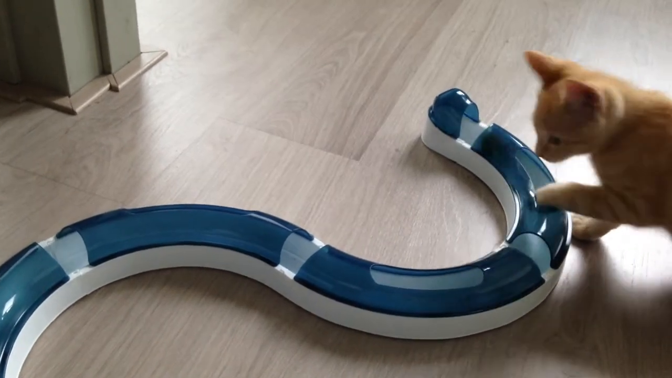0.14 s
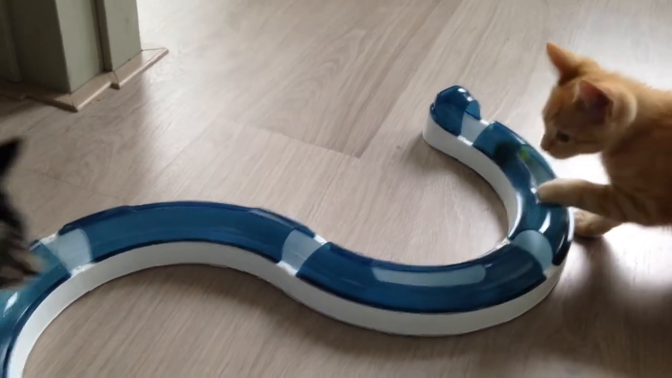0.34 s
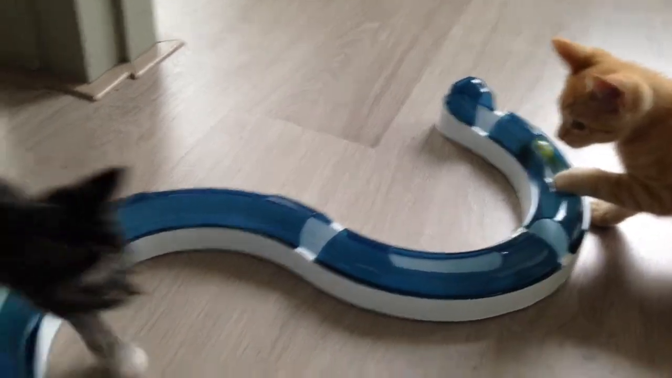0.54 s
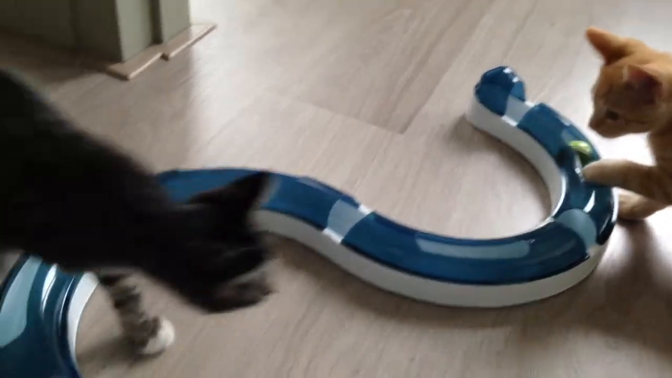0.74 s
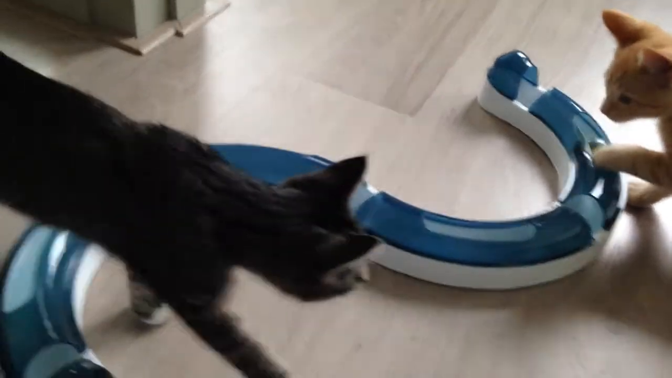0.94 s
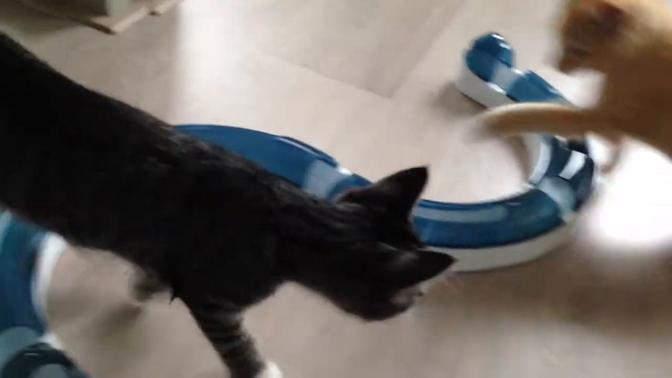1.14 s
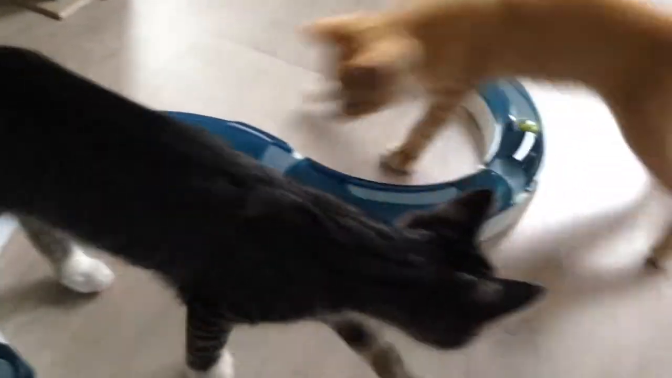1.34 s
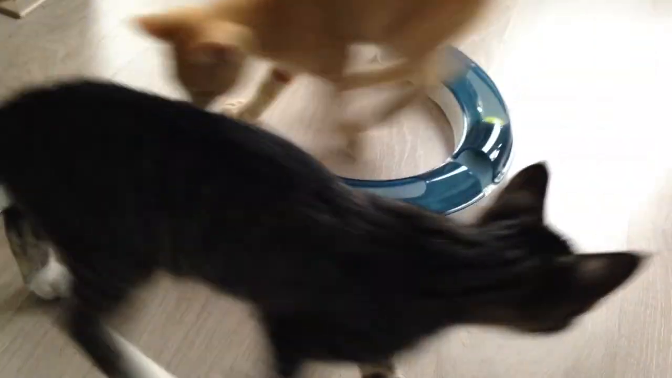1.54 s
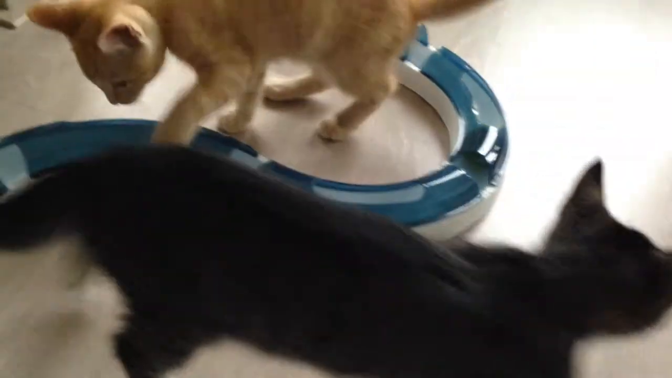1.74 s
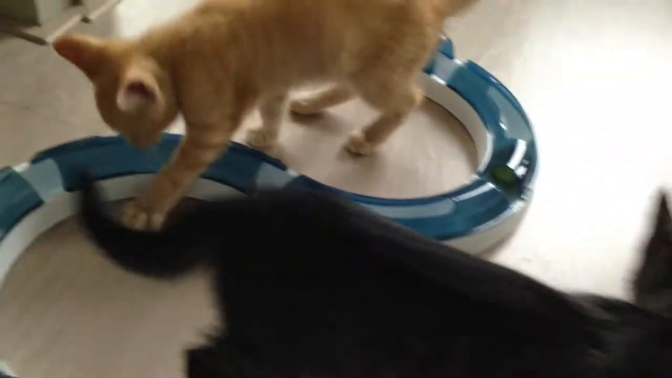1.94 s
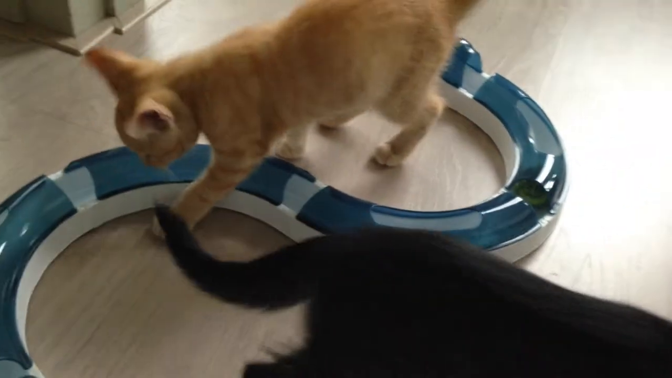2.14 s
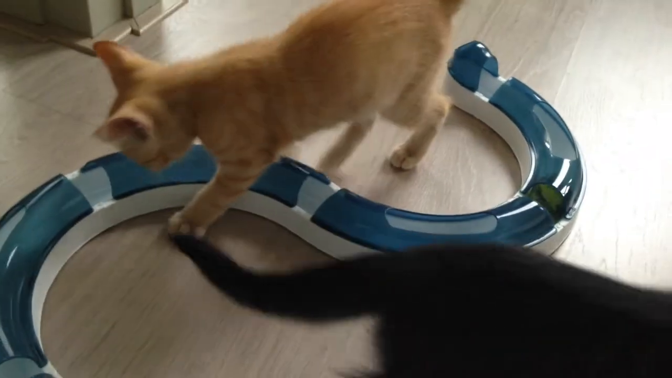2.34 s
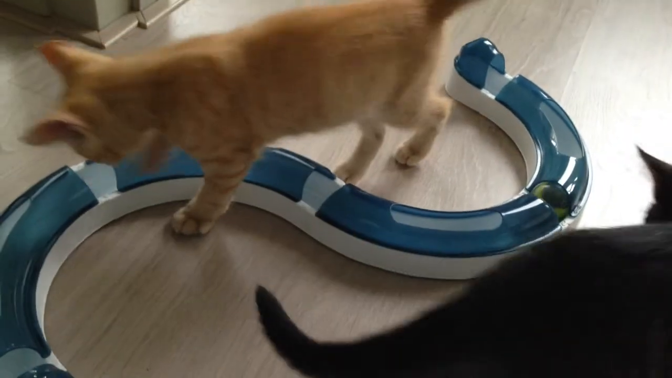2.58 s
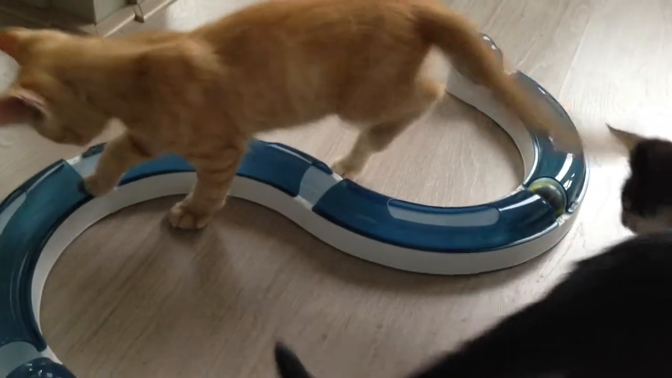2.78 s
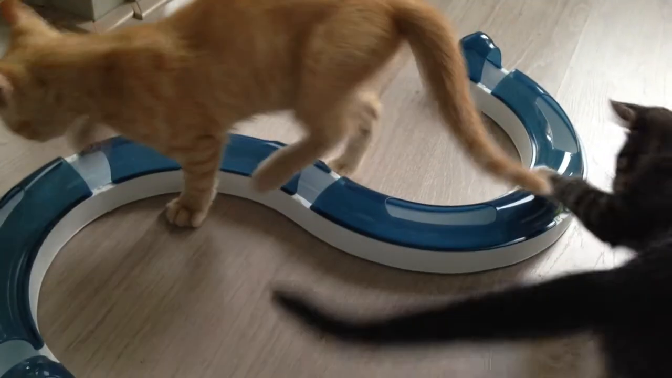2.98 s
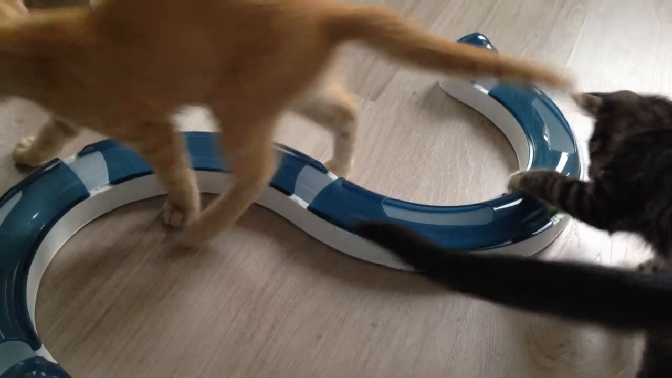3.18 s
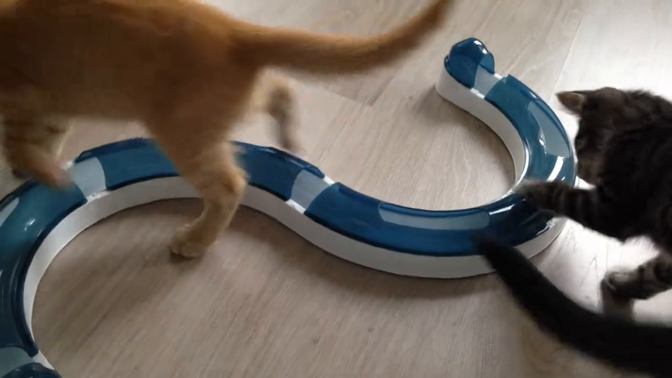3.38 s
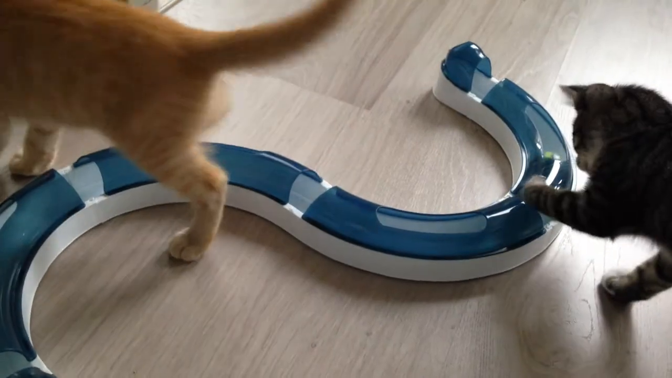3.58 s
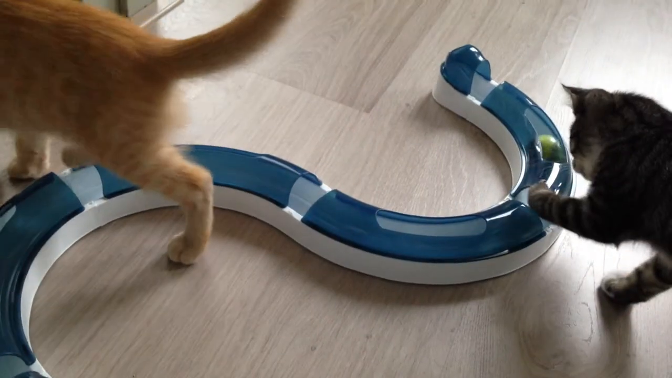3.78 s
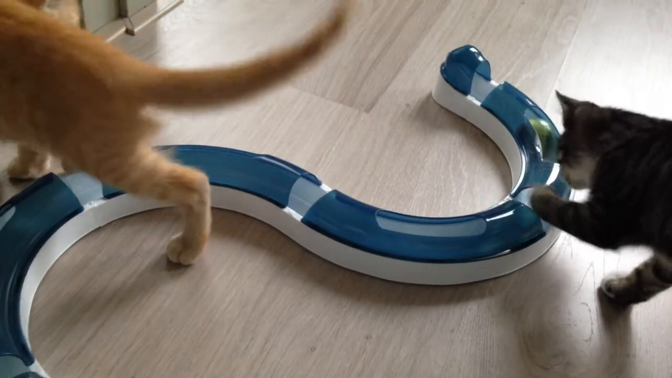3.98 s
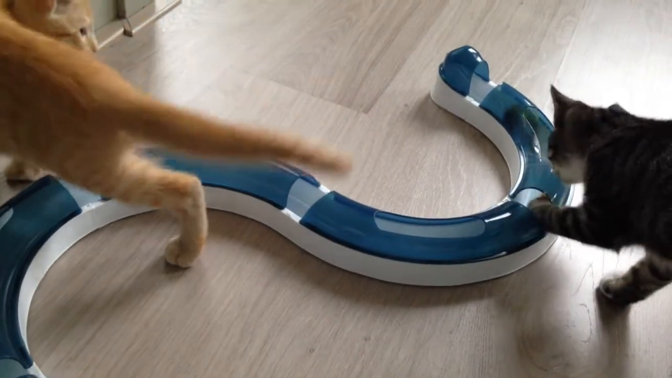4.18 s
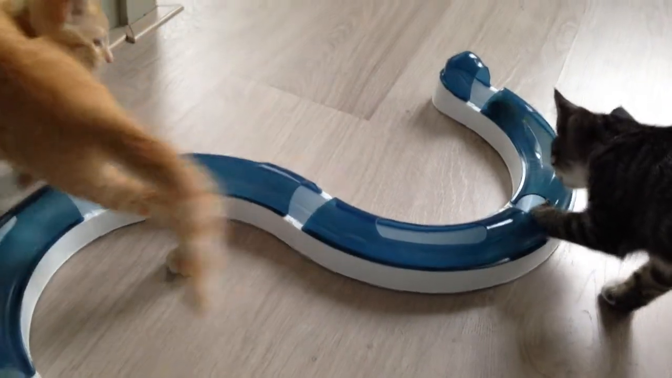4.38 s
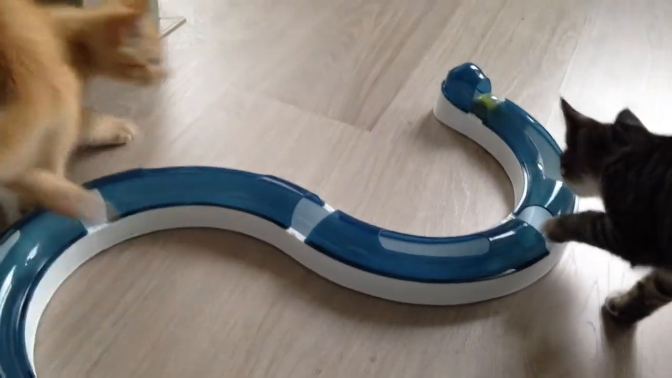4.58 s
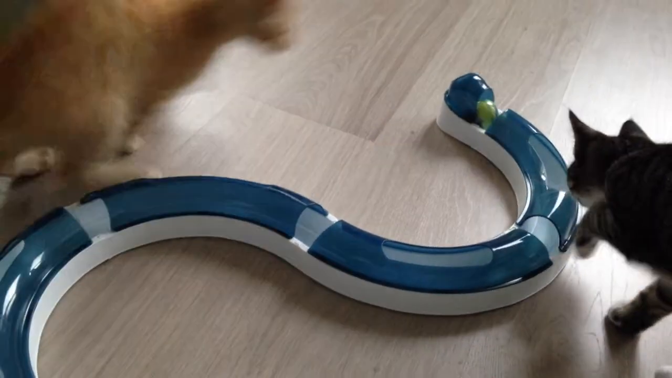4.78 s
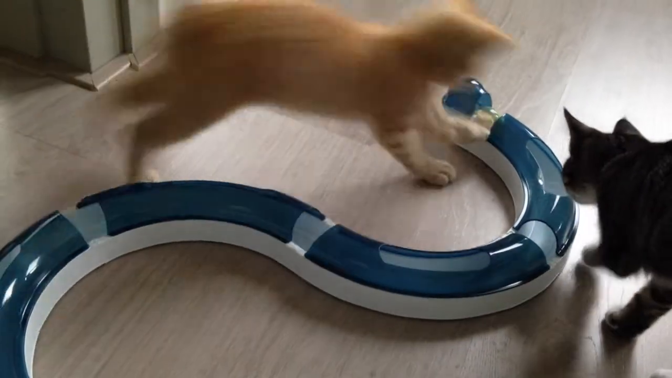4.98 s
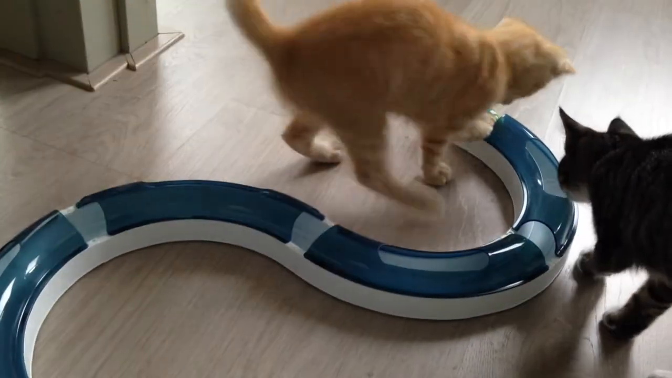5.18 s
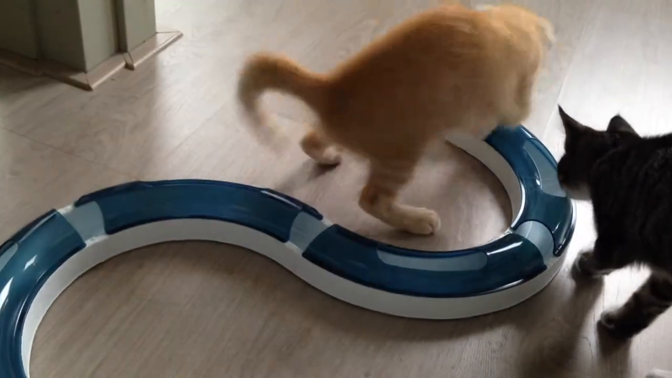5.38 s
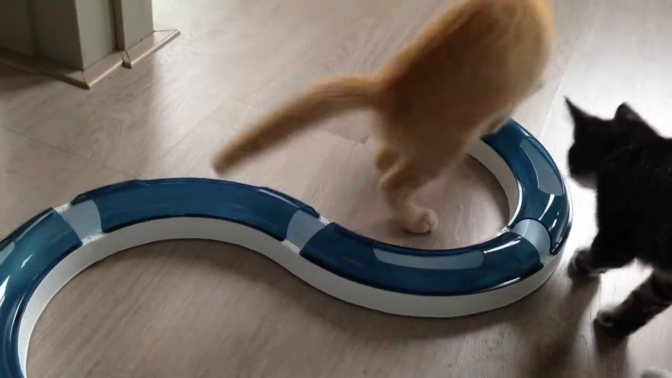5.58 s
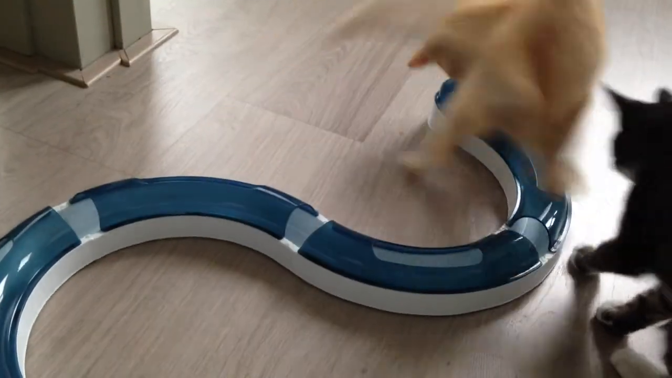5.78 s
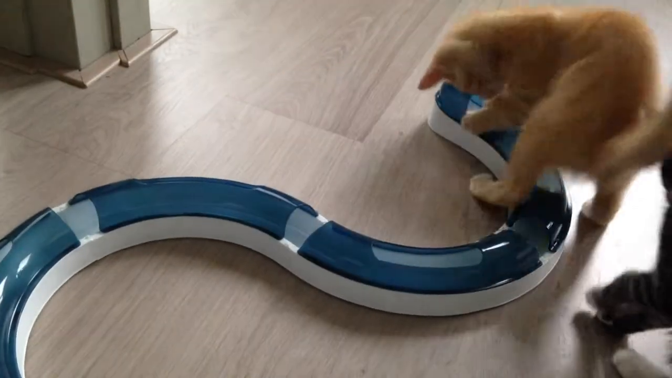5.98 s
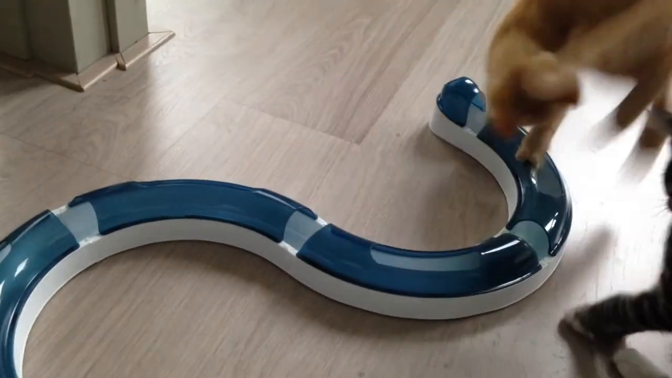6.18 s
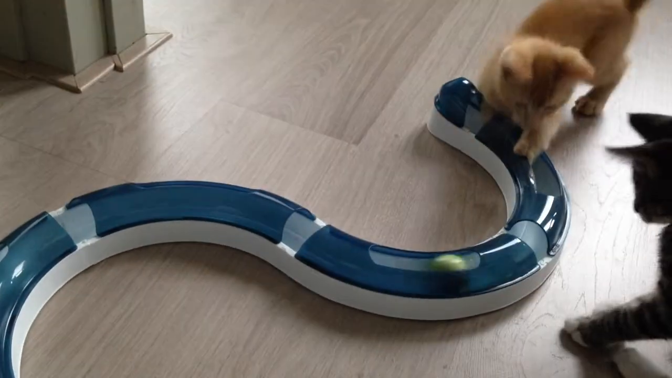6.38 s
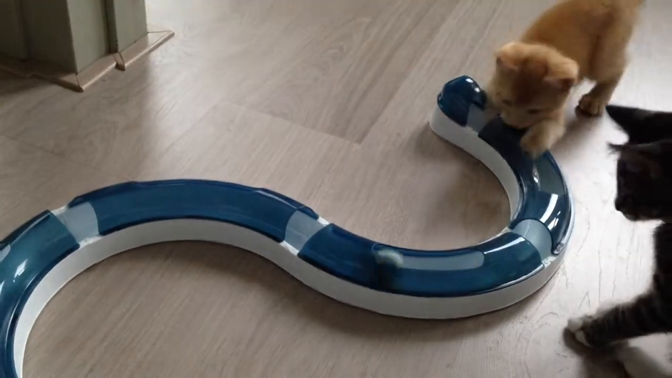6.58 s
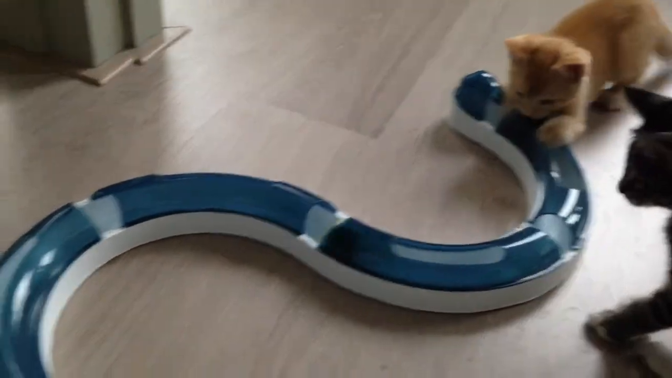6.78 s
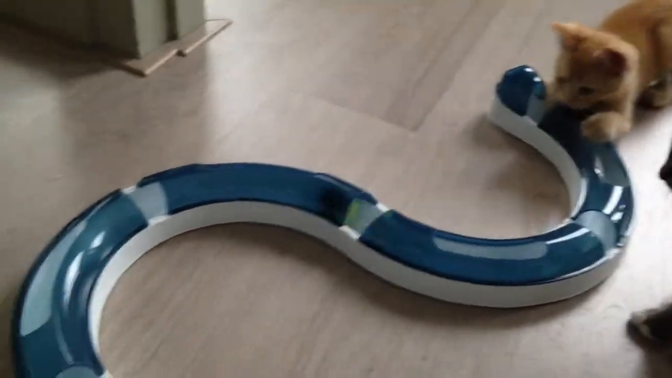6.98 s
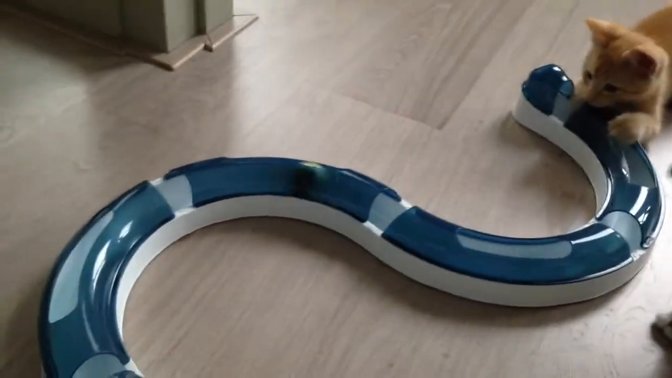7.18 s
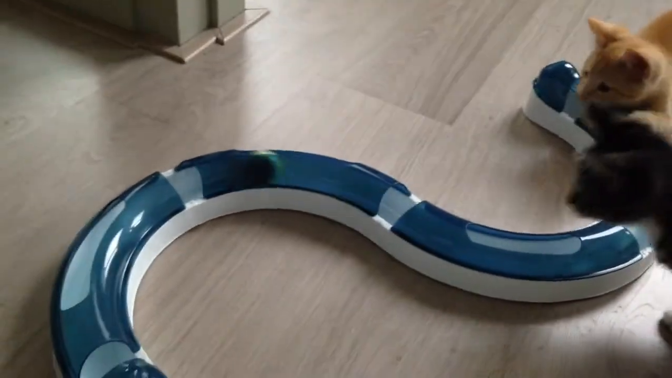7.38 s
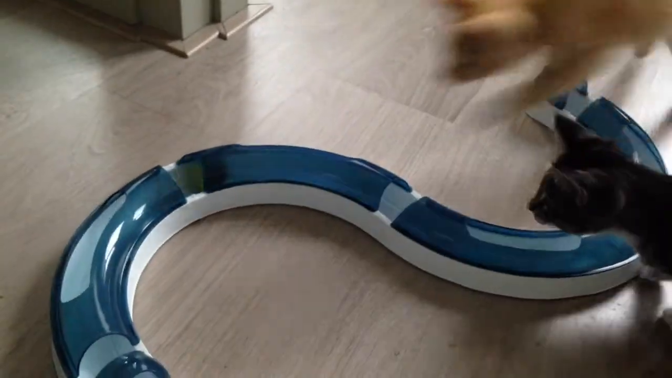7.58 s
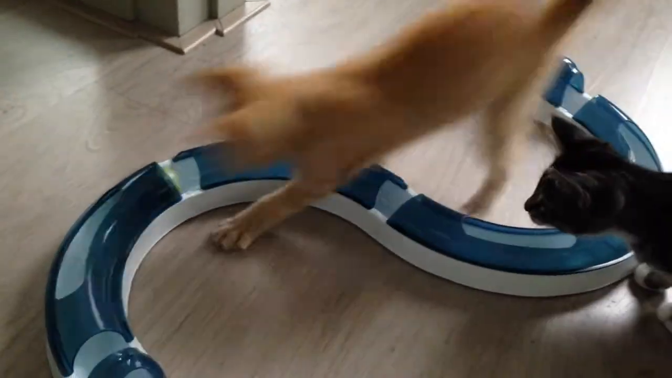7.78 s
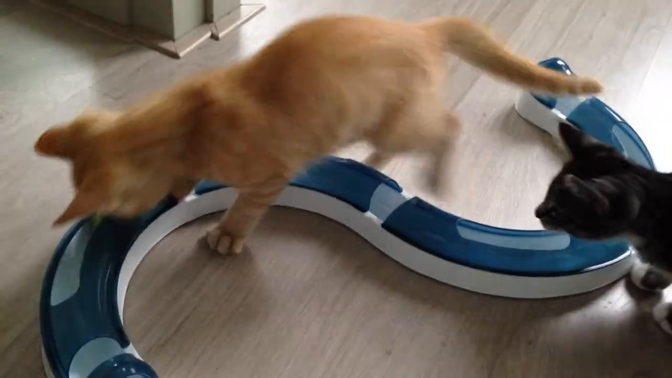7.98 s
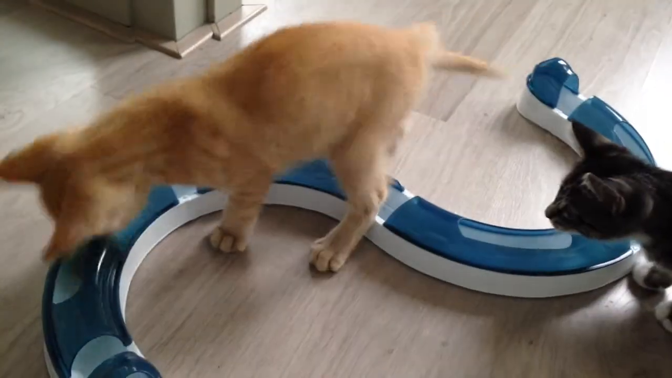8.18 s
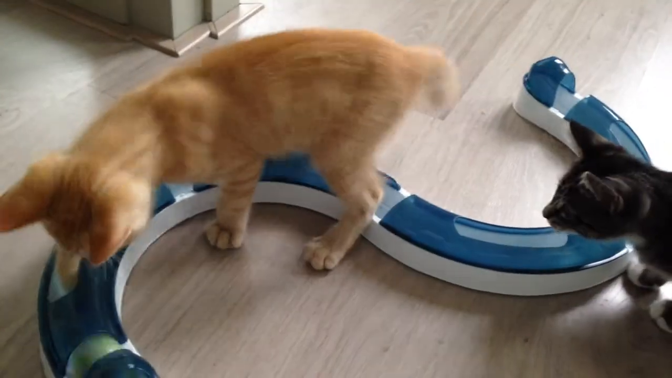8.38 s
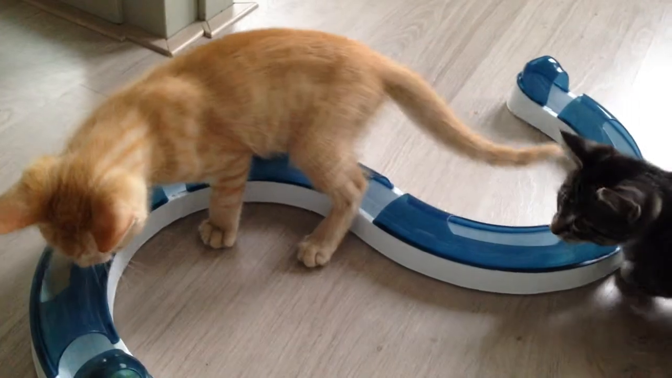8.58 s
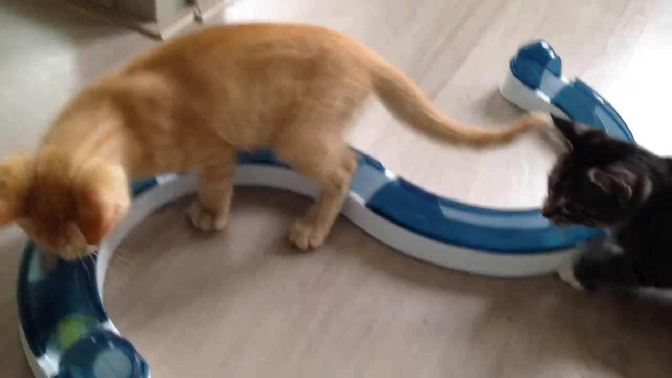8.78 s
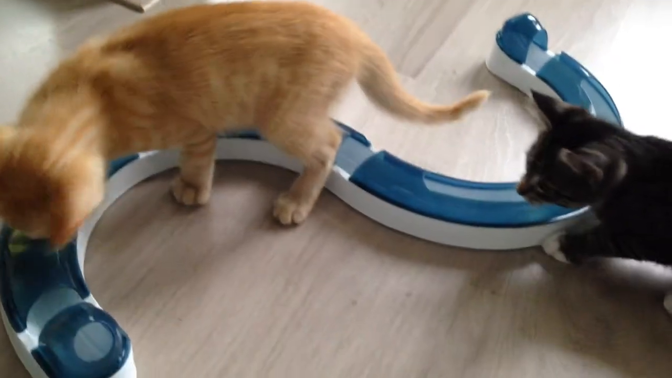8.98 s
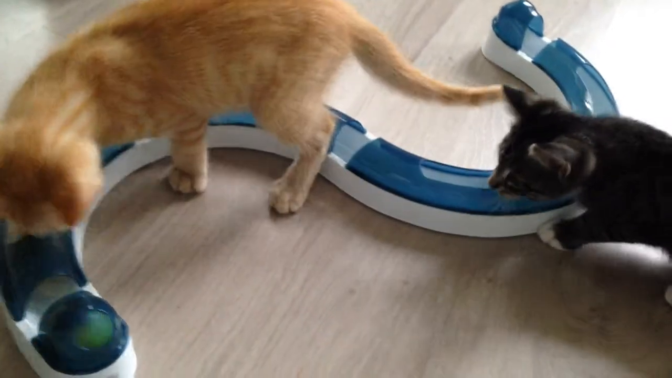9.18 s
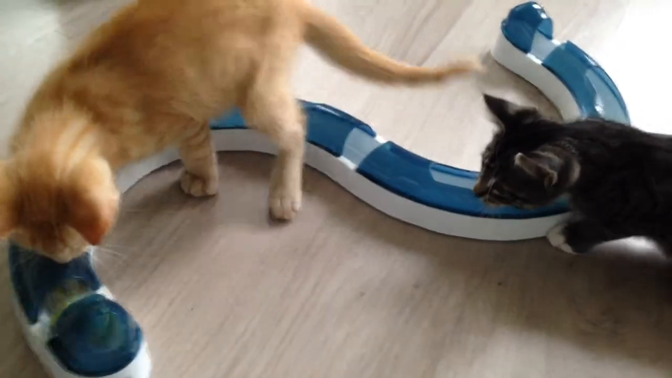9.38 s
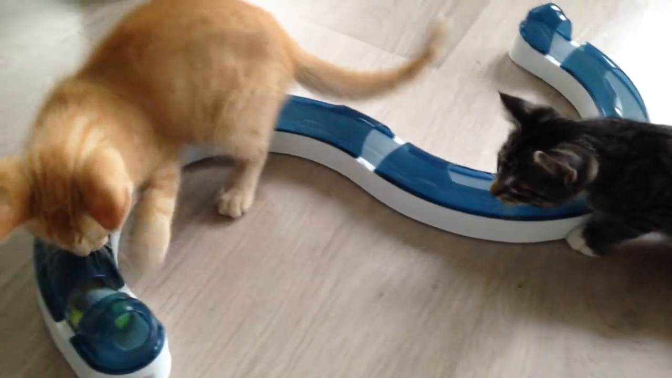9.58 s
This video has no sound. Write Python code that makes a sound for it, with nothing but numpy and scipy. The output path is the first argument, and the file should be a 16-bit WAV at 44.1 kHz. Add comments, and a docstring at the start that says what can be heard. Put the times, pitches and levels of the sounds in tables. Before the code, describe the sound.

A covered plastic ball track lies on a hard floor in a small, briefly echoing room, heard fairly close in one channel. A light click and knock open the scene, then only faint, scattered taps until 3 seconds. Between 3 and 3.7 a small cluster brings a short faint roll, paw rubbing and a clearer click. After a lull, blows resume at 4.6 and crowd together from 5 to 6.4, with a bright click at 5.5, scratchy rubs and soft low thuds. The ball then rolls and rattles away, fading until about 7.5. New knocks lead to the loudest sharp crack just before 8, followed by busy clicks, rubs and rolls to 8.8, and again from 9, with a stronger rumbling roll near 9.3 to the end at 9.6. Soft hiss and traffic rumble continue throughout; a faint engine outside rises until 4.4, then slows.

```python
"""Kittens bat a ball along a covered plastic track on a hard floor in a small room.
At first there are a few scattered blows: each makes the hollow track knock and its cover click and crack.
Outside, an engine, made of a few wavering tones, revs up until about 4.4 s and then slows down.
From about 5 s the blows crowd together, among rolls and rattles (noisy bumps through the track's resonances),
rubbing paws and soft thuds; the loudest blow comes near 8 s. Hiss and traffic rumble run throughout."""
import sys
import numpy as np
from scipy import signal
from scipy.fft import rfft, irfft, next_fast_len
from scipy.io import wavfile
from scipy.ndimage import uniform_filter1d, map_coordinates

SR = 44100
rng = np.random.default_rng(int(sys.argv[2]) if len(sys.argv) > 2 else 0)


def dump(signal):
    """Clip the signal to [-1, 1] and save it as 16-bit WAV at the path in sys.argv[1]."""
    limited = np.clip(np.atleast_2d(signal).T, -1, 1)
    pcm = np.round(limited * 32767).astype(np.int16)
    wavfile.write(sys.argv[1], SR, pcm)


N = 425124

# resonances of the hollow track, before any widening or reweighting: [f/Hz, width/Hz, level/dB]
HOLLOW = [(272, 126, -9), (328, 70, -4.5), (401.5, 22.4, 2.5), (465, 101, -7.5), (555, 150, -8.5),
          (920, 23, -13.5)]
# resonances of its cover, likewise: [f/Hz, width/Hz, level/dB]
COVER = [(1000, 179, -8), (1234, 95, -3.5), (1372, 103, 2.5), (1510, 142, 1.5), (1884, 300, -6.5),
         (2350, 91, 0.5), (2580, 350, -9), (3100, 260, -7), (4120, 190, -11.5)]


def amp(db):
    """Turns decibels into an amplitude factor."""
    return 10 ** (np.asarray(db) / 20)


def unit(x):
    """Scales x to an rms of 1."""
    return x / np.sqrt(np.mean(x ** 2) + 1e-20)


def top(x):
    """Scales x to a peak of 1."""
    return x / np.abs(x).max()


def along(points, hz):
    """Reads a curve of (Hz, value) points, with frequency on a log axis."""
    f, v = np.transpose(points)
    return np.interp(np.log(hz + 1), np.log(f + 1), v)


def curves(rows):
    """Gives one value per sample for each column after the time."""
    s, *cols = np.transpose(rows)
    return [np.interp(np.arange(N) / SR, s, c) for c in cols]


def wobble(rate):
    """A smooth random curve with `rate` random points a second."""
    knots = rng.standard_normal(int(N * rate / SR) + 4)
    return map_coordinates(knots, [np.arange(N) * rate / SR])


def filtered(x, response):
    """Multiplies the spectrum of x by a response that depends on frequency."""
    m = next_fast_len(len(x) + SR // 4)
    return irfft(rfft(x, m) * response(np.fft.rfftfreq(m, 1 / SR)), m)[:len(x)]


def body(modes):
    """The response of an object with (Hz, width, dB) resonances; their signs alternate."""
    def response(f):
        return sum((-1) ** k * amp(db) * 1j * f * width / (hz * hz - f * f + 1j * f * width)
                   for k, (hz, width, db) in enumerate(modes))
    return response


def soft(hz, order=2):
    """A contact of finite length passes little above its corner frequency."""
    return lambda f: (1 + 1j * f / hz) ** -order


def without_bass(hz):
    """A gentle filter that weakens what lies below hz."""
    return lambda f: 1j * f / (hz + 1j * f)


def coloured(x, spectrum):
    """Shapes x by a spectrum and scales it to an rms of 1."""
    return unit(filtered(x, lambda hz: amp(along(spectrum, hz))))


def patchy(x, patchy_db, wide, long):
    """Gives x random loud and weak patches in time and frequency; wide and long count cells."""
    z = signal.stft(x, nperseg=256)[2]
    field = uniform_filter1d(rng.standard_normal(z.shape), wide, 0)
    field = uniform_filter1d(field, long, 1)
    return unit(signal.istft(z * amp(patchy_db * unit(field)), nperseg=256)[1][:N])


def bumps(rate, spread_db, smooth):
    """Tiny random impacts of uneven size (rate per second) over the noise of a smooth rub."""
    happens = rng.random(N) < rate / SR
    hits = happens * rng.choice([-1, 1], N) * amp(spread_db * rng.standard_normal(N))
    return unit(hits) + smooth * rng.standard_normal(N)


def tail():
    """A fresh random room echo of energy 1, in which each frequency dies at its own speed."""
    # how long the room takes to fade by 60 dB: [f/Hz, time/s]
    fading = [(150, 0.25), (500, 0.2), (1400, 0.34), (3700, 0.4), (10000, 0.13)]
    hz, t, z = signal.stft(rng.standard_normal(SR // 2), SR, nperseg=256)
    fade = amp(-60 * t / along(fading, hz)[:, None])
    h = signal.istft(z * fade, SR, nperseg=256)[1]
    return h / np.linalg.norm(h)


def blows(gap_s=.003, damping=5.2, rise_s=0.001491):
    """Each blow knocks the hollow, clicks the cover near its own pitch and cracks; cover and room ring on."""
    # blows on the track: [t/s, cover click level/dB, hollow knock level/dB, crack level/dB, click f/Hz]
    hits = [(0.0186, -41, -44, -70, 2000), (0.542, -54.5, -59, -70, 2480), (0.754, -76, -56, -70, 1050),
            (1.2185, -64, -57.5, -67, 2570), (1.3146, -56, -44.5, -66, 1080),
            (1.6747, -65, -49.5, -47, 2440), (2.759, -48.5, -66, -48, 2470), (2.7816, -55, -65, -69, 2480),
            (3.1324, -57, -49, -69, 2080), (3.1864, -42.5, -41.5, -64, 2380), (3.2882, -69, -53, -70, 1110),
            (3.4571, -51, -74, -66, 2400), (3.5257, -34.5, -36.5, -48.5, 1670),
            (3.6569, -45.5, -61, -68, 2400), (4.622, -38.5, -49, -62, 1930), (4.815, -64, -41, -62, 1000),
            (5.029, -34.5, -42, -44, 2040), (5.0574, -38, -51, -67, 1990),
            (5.2634, -48.5, -75, -46.5, 2030), (5.3613, -49.5, -50, -57, 1500),
            (5.5179, -25, -41.5, -58, 1570), (5.6476, -40.5, -52.5, -58, 1335),
            (5.6806, -41.5, -44.5, -46.5, 2064), (5.7621, -43, -45, -69, 1390),
            (5.78, -37.5, -65, -72, 1380), (5.8423, -34.5, -67, -61, 2477), (5.8639, -36, -39, -40, 1260),
            (5.886, -39, -34.5, -61, 2380), (5.9178, -40, -31.5, -60, 1510), (5.9492, -61, -47, -35, 1450),
            (5.9824, -36, -61, -41, 2350), (6.0446, -45, -64, -55, 2340), (6.126, -39.5, -71, -45, 1900),
            (6.204, -40, -42, -44, 2480), (6.2288, -37, -58, -43, 2500), (6.2515, -27.5, -32.5, -57, 2430),
            (6.2652, -31.5, -41, -29, 2350), (6.3225, -36.5, -68, -51, 1630),
            (6.3986, -41.5, -29.5, -47, 2400), (6.9688, -54.5, -51, -60, 1450), (7.198, -49, -63, -69, 990),
            (7.7582, -29.5, -30, -48, 1050), (7.7996, -40, -47, -60, 1510), (7.8352, -60, -42.5, -64, 1260),
            (7.855, -41, -27, -54, 1110), (7.871, -42.5, -44, -65, 1550), (7.9359, -43.5, -46, -44, 1530),
            (7.9638, -14, -26, -16, 2580), (8.272, -33, -66, -36, 1615), (8.3105, -34, -36.5, -54, 2600),
            (8.335, -26, -44, -55, 1510), (8.4107, -28.5, -58, -61, 2490), (8.4785, -50, -42, -40, 1180),
            (8.5043, -32.5, -30, -40.5, 1320), (8.5371, -64, -37, -68, 1095), (8.5815, -59, -38, -60, 1200),
            (8.61, -45, -35.5, -70, 1120), (8.6329, -52, -39, -75, 1290), (8.6942, -40.5, -40.5, -65, 2370),
            (8.7464, -37.5, -60, -67, 2380), (8.768, -29.5, -31, -43, 1316), (9.055, -42, -64, -50, 1460),
            (9.0909, -41.5, -44, -62, 1360), (9.1356, -27, -29.5, -58, 2410), (9.2152, -27, -41, -46, 2618),
            (9.2359, -28.5, -25.5, -33, 1490), (9.471, -55, -39, -67, 1300),
            (9.4991, -38.5, -35, -61, 1910), (9.587, -26, -30, -47, 1700), (9.6009, -36, -44, -42, 1250)]
    # relative spectrum of a crack: [f/Hz, level per Hz/dB]
    crack_spectrum = [(1760, -40), (3000, 5), (4200, -4.5), (7500, -11.5), (10400, -14), (15000, -28),
                      (16000, -42)]
    knock_hz, ring_db = 450, -2  # pitch of the hollow under a blow; strength of the ringing on

    def near(modes, hz, widen, db_per_octave):
        # modes far from the struck pitch are weaker, and each blow shifts their strengths a little
        return [(f, widen * w, g - db_per_octave * abs(np.log2(f / hz)) + rng.normal(0, 1.5))
                for f, w, g in modes]

    def bright(hz):
        gain = amp(along(crack_spectrum, hz))
        return gain / np.sqrt(np.mean(gain ** 2))

    out, t = np.zeros(N + SR), np.arange(SR // 8) / SR
    hiss = coloured(rng.standard_normal(N), crack_spectrum)
    for s, click_db, knock_db, crack_db, click_hz in hits:
        # one sharp touch, then a short noisy chatter
        touch = (np.arange(len(t)) == round(rise_s * SR)) * 1.0
        chatter = rng.standard_normal(len(t)) * (1 - np.exp(-t / rise_s)) * amp(-60 * t / 0.028)

        low = body(near(HOLLOW, knock_hz, 1.3, 12) + [(knock_hz, 150, 2)])
        knock = filtered(touch + 0.098 * chatter, soft(2.86 * knock_hz, order=3))
        knock = filtered(knock, lambda f: low(f) * without_bass(250)(f))
        knock = amp(knock_db) * top(knock)

        push = filtered(touch + 0.48 * chatter,
                        lambda f: soft(1.64 * click_hz, order=3)(f) * without_bass(700)(f))
        spot = filtered(push, body([(click_hz, 450, 0.1)]))  # the struck spot has a pitch of its own
        cover = filtered(np.roll(push, 12), body(near(COVER, click_hz, damping, 2.3)))
        click = top(spot + cover)

        # the duller sound that rings on: its upper modes are weaker
        shell = filtered(filtered(touch, soft(1330)), body([(f, 1.75 * w, g) for f, w, g in COVER]))
        dull_spot = filtered(touch, lambda f: body([(0.85 * click_hz, 700, 0)])(f) * soft(2500)(f))
        dull = (0.55 * unit(shell) + 0.39 * unit(dull_spot)) * np.std(click)

        noise = hiss[rng.integers(N // 2):][:len(t)]
        crack = amp(crack_db) * top(noise * t * amp(-60 * t / 0.006))
        out[round(s * SR):][:len(t)] += knock + amp(click_db) * click + crack

        ring = amp(ring_db) * signal.fftconvolve(knock + amp(click_db) * dull, tail())
        crack_tail = np.pad(tail(), (0, len(ring)))[:len(ring)]
        ring += amp(ring_db) * 0.53 * np.linalg.norm(crack) * filtered(crack_tail, bright)
        out[round((s + gap_s) * SR):][:len(ring)] += ring
    return out[:N]


def rolling():
    """Bumps under the moving ball excite the track's resonances; each roll starts, slows and stops alike."""
    # rolls of the ball: [start t/s, length/s, hollow rumble level/dB, cover rattle level/dB];
    # the levels hold at the start, before slowing and jolts
    rolls = [(0, 0.033, -69.5, -70), (3.066, 0.79, -71, -74), (4.59, 0.79, -73, -80),
             (5.562, 0.11, -76, -68), (5.89, 0.33, -61, -63), (6.316, 1.11, -60.5, -64),
             (7.577, .55, -62.5, -66), (8.319, 0.088, -66, -56.5), (8.49, 0.54, -62, -64.5),
             (9.228, 0.49, -51, -60)]
    start_s, stop_s = 0.093, 0.22  # a push and a halt
    slowing_db_per_s = 4.5  # fading as the ball loses speed
    t, low, high = np.arange(N) / SR, 0, 0
    for s, length, rumble_db, rattle_db in rolls:
        moving = np.interp(t - s, [-start_s, 0, length, length + stop_s], [0, 1, 1, 0])
        moving = moving * amp(-slowing_db_per_s * (t - s))
        low = low + amp(rumble_db) * moving
        high = high + amp(rattle_db) * moving
    jolt = amp(1.5 * wobble(25) + 0.8 * wobble(8))
    rumble = unit(filtered(bumps(120, spread_db=4, smooth=1.26), body(HOLLOW)))
    rattle = filtered(bumps(300, spread_db=3.5, smooth=0.97), soft(3900))
    rattle = unit(filtered(rattle, body(COVER)))
    rattle = patchy(rattle, 2.2, wide=3, long=14)
    return jolt * (low * rumble + high * rattle)


def squeaks(length, centre_hz):
    """Claws catch and let go: brief pings of scattered pitch and size."""
    per_s, ring_s = 110, .016  # pings per second; time for a ping to fade by 60 dB
    middle_db = 8  # typical ping level over the rub, before its rise and fade
    out, t = np.zeros(round(length * SR) + SR // 10), np.arange(SR // 20) / SR
    for pitch, size in rng.standard_normal((int(1 + length * per_s), 2)):
        hz = centre_hz * 1.4 ** pitch
        envelope = amp(middle_db + 3 * size - 60 * t / ring_s) * (1 - np.exp(-t / .001))
        ping = envelope * np.sin(2 * np.pi * hz * t)
        out[int(rng.random() * length * SR):][:len(t)] += ping
    return out[:round(length * SR)]


def rubs():
    """A rub of paws and fur swells and fades: uneven slips in a broad band, partly sounding the cover."""
    # paws and fur rubbing the cover: [start t/s, length/s, level of the broad part before the swell/dB, centre f/Hz]
    strokes = [(3.083, .15, -64, 2030), (3.431, 0.19, -59, 2820), (5.507, 0.0084, -48.5, 1750),
               (7.95, 0.028, -44, 2140), (5.817, 0.18, -54, 4100), (5.931, .25, -57, 5420),
               (6.165, 0.1, -56, 3370), (8.269, 0.11, -54, 4550), (8.304, 0.032, -50, 3100),
               (8.407, 0.067, -58.5, 6370), (8.642, 0.097, -63, 5870), (9.082, 0.12, -60, 6300),
               (9.316, 0.41, -59.5, 2968)]
    out = np.zeros(N + SR)
    slips = bumps(250, spread_db=5, smooth=.8) * amp(3 * wobble(60))
    slips = patchy(slips, 4, wide=4, long=5)
    for s, length, db, centre_hz in strokes:
        part = slips[round(s * SR):][:round(length * SR)]
        broad = filtered(part, soft(0.96 * centre_hz))
        broad = unit(filtered(broad, body([(centre_hz, 3.4 * centre_hz, 0)])))
        cover = unit(filtered(part, body(COVER)))
        swell = np.sin(np.pi * np.arange(len(part)) / len(part))
        mix = broad + 0.84 * cover + squeaks(length, centre_hz)[:len(part)]
        out[round(s * SR):][:len(part)] += amp(db) * swell * mix
    return out[:N] + amp(-8.0) * signal.fftconvolve(out, tail())[:N]


def thuds():
    """A soft paw landing sets the floorboards in brief low motion."""
    # paws landing on the floor: [t/s, level before rise and fade/dB, f/Hz]
    landings = [(3.531, -54, 152), (5.868, -39.5, 144), (6.253, -45.5, 170), (6.397, -44, 201),
                (7.96, -40.5, 218), (9.133, -46, 155.7)]
    out, t = np.zeros(N + SR), np.arange(SR // 4) / SR
    for s, db, hz in landings:
        envelope = amp(db - 60 * t / 0.15) * (1 - np.exp(-t / 0.00047))
        out[round(s * SR):][:len(t)] += envelope * np.sin(2 * np.pi * hz * t)
    return out[:N]


def engine():
    """Tones at 3, 5 and 6 times the firing cycle, with slightly wavering levels and phases."""
    # engine outside: [t/s, firing cycle f/Hz, 3rd order level/dB, 5th order level/dB], before the wavering
    revs = [(0, 18.6, -85, -75), (1, 19.35, -85, -71), (2, 20.4, -85, -65), (2.5, 20.85, -85, -57),
            (3.3, 21.8, -85, -54.5), (4.4, 22.9, -80, -65), (4.9, 22.25, -71, -63), (5.3, 21.85, -62, -59),
            (5.6, 21.2, -59, -64), (6, 20.3, -64, -69), (6.5, 19.4, -66, -69), (7, 18.55, -76, -68),
            (7.8, 17.4, -66, -74), (8.2, 17.25, -85, -71), (8.75, 17.45, -85, -66), (9.64, 17.7, -76, -73)]
    weaken_s = 3.7  # when the 6th order starts to weaken, shortly before the revs peak
    early_db, late_db = -4.5, -10  # 6th order relative to the 5th, before and after
    cycle_hz, third_db, fifth_db = curves(revs)
    since_weaken = np.arange(N) / SR - weaken_s
    sixth_db = fifth_db + np.interp(since_weaken, [0, .4], [early_db, late_db])
    turn = 2 * np.pi * np.cumsum(cycle_hz) / SR
    out = np.zeros(N)
    for order, db in zip((3, 5, 6), (third_db, fifth_db, sixth_db)):
        level = np.sqrt(2) * amp(db + 0.18 * wobble(2.3))  # dB are rms levels
        phase = order * turn + 0.13 * wobble(12) + rng.uniform(0, 2 * np.pi)
        out += level * np.sin(phase)
    return out


def background():
    """Steady hiss over a lumpy traffic rumble, both made of shaped noise."""
    # relative spectrum of microphone hiss and house noise: [f/Hz, level per Hz/dB]
    hiss_spectrum = [(94, -20), (160, -27.5), (198, -3.5), (259, -7), (320, -4.5), (403, -9.5), (889, -17),
                     (979, -20), (1410, -18.5), (1880, -21), (2080, -17.5), (14500, -20.5), (16000, -22)]
    # relative spectrum of the traffic: [f/Hz, level per Hz/dB]
    traffic_spectrum = [(12, -49), (20, -34), (45, -2), (75, 0), (96, 0), (119, 1.5), (200, -7.5),
                        (260, -39.5), (440, -120)]
    # traffic rumble before the random lumps: [t/s, level/dB]
    rumble_level = [(0, -69), (2, -67.5), (3, -68.5), (4.2, -66), (5.5, -63), (7, -64.5), (8, -64.5),
                    (9.64, -64.5)]
    hiss = amp(-66.5) * coloured(rng.standard_normal(N), hiss_spectrum)
    lumpy = amp(curves(rumble_level)[0] + 0.79 * wobble(2.6))
    return hiss + lumpy * coloured(rng.standard_normal(N), traffic_spectrum)


def scene():
    """Adds all the sources into one channel."""
    return (blows() + rolling() + rubs() + thuds() + engine() + background())[None]


def record(dry):
    """Keeps nothing above the band limit of 15380 Hz."""
    return filtered(dry[0], lambda hz: hz < 15380)[None]


dry = scene()
out = record(dry)
dump(out)
```